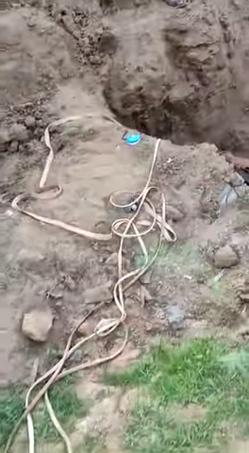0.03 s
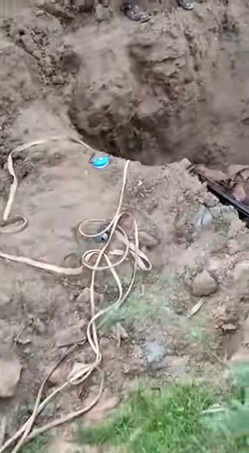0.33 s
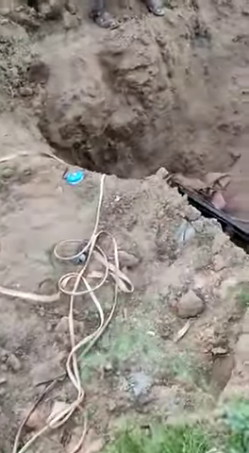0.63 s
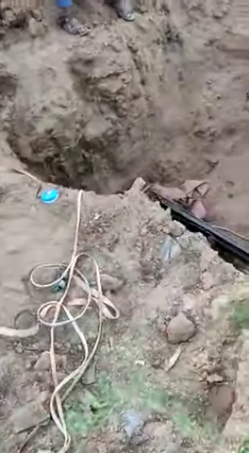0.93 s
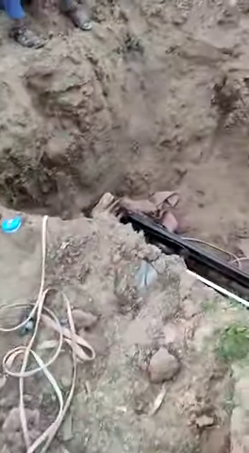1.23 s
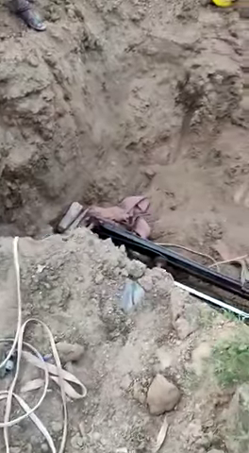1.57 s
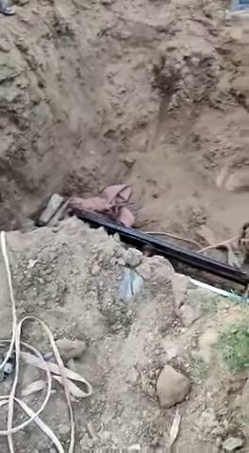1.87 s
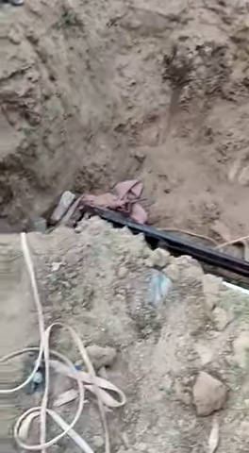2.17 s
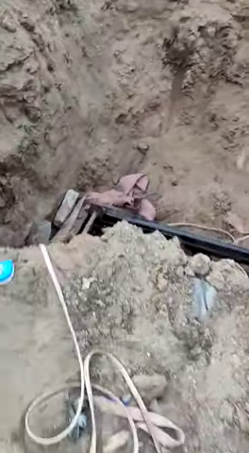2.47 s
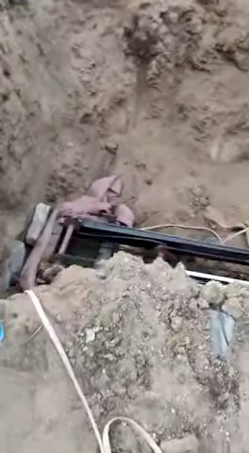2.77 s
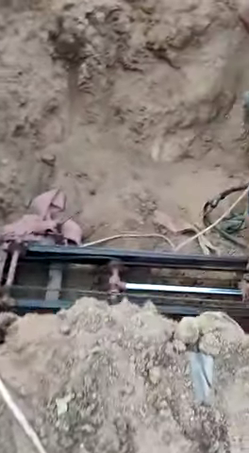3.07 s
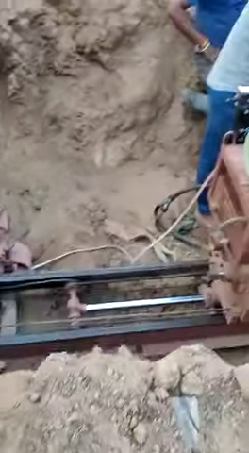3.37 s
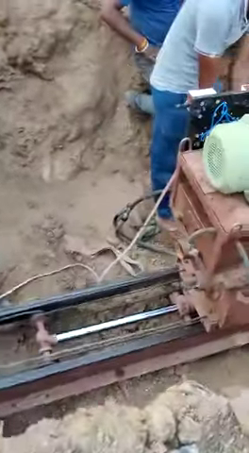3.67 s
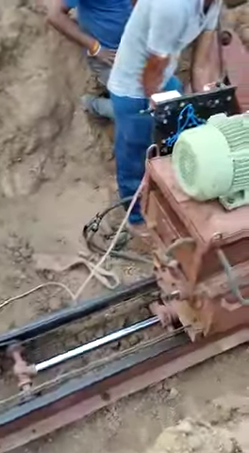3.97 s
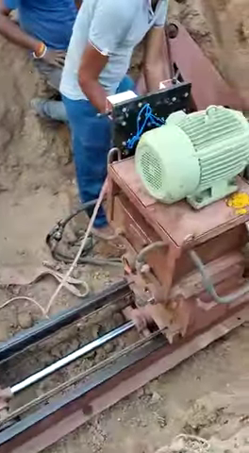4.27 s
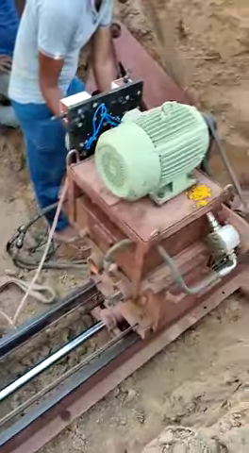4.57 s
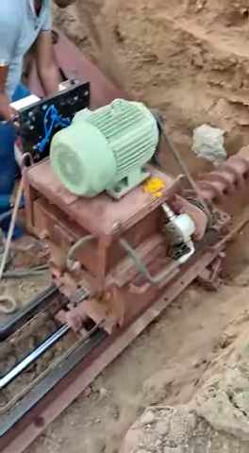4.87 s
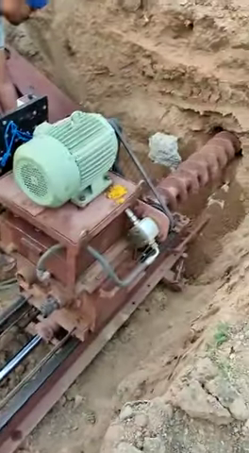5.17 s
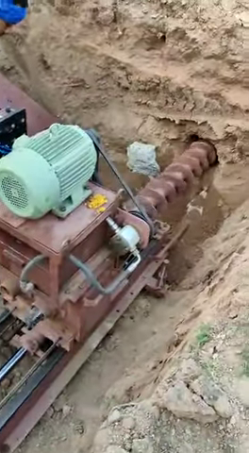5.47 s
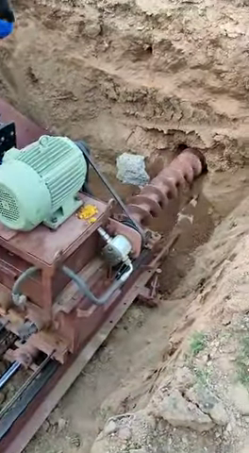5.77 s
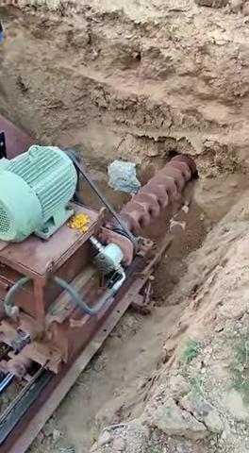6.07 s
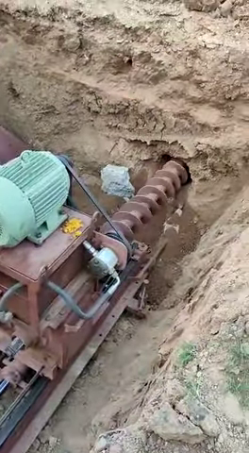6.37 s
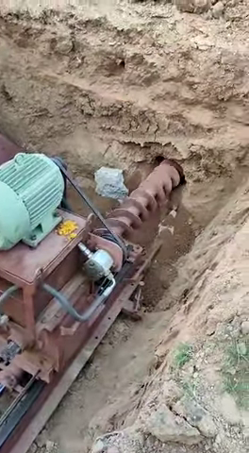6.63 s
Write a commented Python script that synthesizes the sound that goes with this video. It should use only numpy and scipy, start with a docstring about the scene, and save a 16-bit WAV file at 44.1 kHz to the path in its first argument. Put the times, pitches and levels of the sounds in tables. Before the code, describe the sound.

A generator engine drones steadily beside an earth pit, with rapid knocking, gear clatter and a bright, fast metallic tick. The boring rig's drive adds a rough whine over a low rumble. As the microphone moves along the rim toward the rig, a few dull thumps, small knocks and one scuff pass by. Near the end the auger's hollow churning grows louder while the engine keeps its pace.

```python
"""An auger boring rig in an earth pit.

A listener walks along the rim. The four-stroke generator that feeds the rig's electric motor sets the beat:
an exhaust drone, a block that knocks alike in every cycle, and one bright steel tick per turn. The drive
whines and the auger churns in its bore, over a low rumble, a few dull thumps, small knocks and one scuff."""
import sys
import numpy as np
from scipy import signal
from scipy.fft import rfft, irfft, next_fast_len
from scipy.io import wavfile
from scipy.ndimage import map_coordinates

SR = 44100
rng = np.random.default_rng(int(sys.argv[2]) if len(sys.argv) > 2 else 0)


def to_wav(sig):
    """Store sig (one row per channel, or 1-D mono) as 16-bit WAV at the path in sys.argv[1].

    Samples outside -1..1 are clipped; the rate is SR.
    """
    pcm = np.clip(np.atleast_2d(sig), -1, 1) * 32767
    pcm = np.round(pcm).astype(np.int16)
    wavfile.write(sys.argv[1], SR, pcm.T)  # frames by channels


N = 295470


def amp(db):
    """Amplitude ratio of a level in decibels."""
    return 10 ** (np.asarray(db) / 20)

def unit(x):
    """Normalisation to an rms of 1."""
    return x / np.sqrt(np.mean(x ** 2) + 1e-20)

def curves(rows):
    """Linear interpolation in time: one curve for each column after the first."""
    times, *columns = np.transpose(rows)
    return [np.interp(np.arange(N) / SR, times, column) for column in columns]

def wobble(rate):
    """Smooth random modulation, with rate knots a second."""
    return map_coordinates(rng.standard_normal(int(N * rate / SR) + 4), [np.arange(N) * rate / SR])

def filtered(x, response):
    """Linear filtering: the spectrum is multiplied by a frequency response."""
    size = next_fast_len(N + 8192)
    return irfft(rfft(x, size) * response(np.fft.rfftfreq(size, 1 / SR)), size)[..., :N]

def colour(x, points):
    """Spectral shaping by (Hz, dB) points on a logarithmic frequency axis."""
    f, db = np.transpose(points)
    return filtered(x, lambda hz: amp(np.interp(np.log(hz + 1), np.log(f), db)))

def ringing(x, modes, sign=-1):
    """Modal superposition of (Hz, bandwidth, dB) resonances; a sign near 1 leaves notches between them."""
    return filtered(x, lambda f: sum(sign ** k * amp(db) * 1j * f * width / (hz**2 - f**2 + 1j * f * width)
                                     for k, (hz, width, db) in enumerate(modes)))

def shifted(x, hz):
    """Single-sideband modulation slides every frequency by a curve in Hz."""
    analytic = signal.hilbert(x, next_fast_len(N))[..., :N]
    return np.real(analytic * np.exp(2j * np.pi * np.cumsum(hz) / SR))

def pan(balance_db):
    """Constant-power panning; a positive balance favours the left."""
    gains = amp(np.array([[.5], [-.5]]) * balance_db)
    return gains / np.sqrt(np.mean(gains ** 2, axis=0))

def spread(pair, side_db):
    """Mid-side stereo from two uncorrelated signals."""
    side = amp(side_db) * pair[1]
    return np.array([pair[0] + side, pair[0] - side])

def cyclic(turn, memory, fresh):
    """Quasi-periodic noise pair: a drifting two-turn pattern plus a fresh share of the power."""
    size = int(2 * N / (turn[-1] - turn[0]))
    cycles = rng.standard_normal((2, int(turn[-1] / 2) + 2, size))
    keep = np.clip(memory, 0, .995)
    for i in range(1, cycles.shape[1]):
        cycles[:, i] = keep * cycles[:, i - 1] + np.sqrt(1 - keep ** 2) * cycles[:, i]
    pattern = np.array([map_coordinates(c.ravel(), [turn * size / 2]) for c in cycles])
    return np.sqrt(1 - fresh) * pattern + np.sqrt(fresh) * rng.standard_normal((2, N))

def blows(turn, angle, rise, decay, scatter_db):
    """Exponential envelope of one blow per turn; angle, rise and decay are in turns."""
    count, age = np.divmod(turn - angle + 1, 1)
    force = amp(scatter_db * rng.standard_normal(256))[count.astype(int) % 256]
    return force * (1 - np.exp(-age / rise)) * np.exp(-age / decay)

def labour(turn):
    """Amplitude modulation at half the shaft rate: every second turn labours harder."""
    return amp(-1.3 * np.sin(np.pi * turn))

# Each row: time in seconds, nearness to the rig from 0 to 1.
NEARNESS = [(0, 0.2), (2.5, 0.17), (3.3, 0.44), (4.3, 0.76)]
def nearness():
    """The listener's position along the walk: 0 is far from the rig, 1 beside it."""
    return curves(NEARNESS)[0]

def walk_gain(far_db, near_db, screened_db=0):
    """Level follows position and drops in the acoustic shadow of a spoil heap."""
    heap_s, width_s = 2.68, .99
    shadow = np.exp(-((np.arange(N) / SR - heap_s) / width_s) ** 2)
    return amp(far_db + (near_db - far_db) * nearness() - screened_db * shadow)

# The weaker exhaust lines. Each row: multiple of the shaft rate, relative level in dB.
EXHAUST_LINES = [(1, -18.5), (1.5, -26), (2.5, -16.5), (3, -14.5), (3.5, -8), (4.5, -7.5), (5, 3.5),
                 (5.5, -22), (6, 2), (6.5, -13), (7, -10.5), (8, -18.5), (9, -17.5)]
# Each row: time in seconds, level of the firing tone's octave in dB, level of the weaker lines in dB.
STANDING_WAVES = [(0, -25, -28.5), (.4, -26, -27.5), (.9, -19.5, -27), (1.36, -16, -32), (1.8, -15, -33),
                  (2.2, -14.5, -30.5), (2.75, -15, -26.5), (3.6, -18.5, -29), (4.7, -20, -28),
                  (6.7, -20, -28.5)]
def exhaust(turn, limp=.15):
    """Periodic firing, heard through standing waves: one weak, late cylinder of four adds extra lines."""
    def line(order, lag=0):
        return -np.sqrt(2) * np.sin(2 * np.pi * (order * turn - lag))
    octave_db, weak_db = curves(STANDING_WAVES)
    weak = np.zeros(N)
    for order, db in EXHAUST_LINES:
        lead = 0 if 3 < order < 6 else .25  # in cycles; lines outside the pipe's boom lead
        weak += amp(db + .35 * wobble(3)) * line(order, lag=2 * limp * (order % 1) - lead)
    firing = walk_gain(far_db=-17, near_db=-27.5, screened_db=1.5) * amp(.1 * wobble(6)) * line(order=2)
    octave = amp(octave_db + .1 * wobble(11)) * line(order=4)
    return (firing + octave + amp(weak_db) * unit(weak)) * pan(np.interp(nearness(), [0, 1], [6.5, 6]))

# Each row: frequency in Hz, relative spectral density in dB.
BLOCK_SPECTRUM = [(130, -14), (200, -1.5), (250, -7), (320, -5.5), (440, -3), (600, -1.5), (800, -6),
                  (1000, -9.5), (1500, -22), (3000, -66.5)]
def block(turn, shake):
    """Forced vibration: the engine block is shaken alike in each cycle."""
    noise = spread(colour(cyclic(turn, memory=.85, fresh=.51), BLOCK_SPECTRUM), side_db=-5)
    return unit(noise * (1 + .5 * shake) * labour(turn)) * pan(1)

# Gear bodies, teeth and clack. Each row: frequency in Hz, relative spectral density in dB.
GEAR_SPECTRUM = [(450, -13), (800, -8.5), (1150, -0.5), (1450, -3), (1750, -6), (2500, -23), (3500, -36)]
TEETH_SPECTRUM = [(900, -20), (1400, -1), (1750, -2.5), (2100, -3), (2600, -8), (3500, -13), (6000, -28.5)]
CLACK_SPECTRUM = [(600, -21), (1000, -9), (1400, 0), (1800, -9), (2500, -21), (3500, -33)]
# Each row: frequency in Hz, phase lead of the left microphone port in radians.
PORT_PHASE = [(0, -3.5), (780, -0.4), (1810, -2.5), (2240, -2.5), (3700, -4), (5600, -6), (6630, -5),
              (7320, -4.5), (8440, 7)]
def gears(turn, shake, body_db, teeth_db):
    """Impact noise: gears rattle, clack every second turn and reach the two ports out of phase."""
    body = spread(colour(cyclic(turn, memory=.928, fresh=.37), GEAR_SPECTRUM), side_db=-5.5)
    body = amp(body_db) * unit(body * (1 + 1.8 * shake) * labour(turn))
    teeth = spread(colour(cyclic(turn, memory=.995, fresh=.4), TEETH_SPECTRUM), side_db=-5)
    teeth = amp(teeth_db) * unit(teeth * (1 + 2.2 * shake) * labour(turn))
    clack = spread(colour(cyclic(turn, memory=.99, fresh=.2), CLACK_SPECTRUM), side_db=-11.5)
    clack *= blows(turn / 2, angle=.85, rise=.0091, decay=.03, scatter_db=1.8)
    clack = walk_gain(far_db=-55.5, near_db=-49) * unit(clack)
    drive = (body + clack) * pan(-11.5) + teeth * pan(-19.5)
    f, lead = np.transpose(PORT_PHASE)
    return filtered(drive, lambda hz: np.exp(np.array([[.5j], [-.5j]]) * np.interp(hz, f, lead)))

# Each row: frequency in Hz, bandwidth in Hz, relative level in dB.
HOLLOW_MODES = [(307.5, 45, -1), (347, 54, 1.5)]
# Each row: time in seconds, level in dB.
HOLLOW_LEVEL = [(0, -57), (.7, -52), (1.05, -34.5), (1.35, -42.5), (1.55, -40.5), (2.3, -38.5), (2.9, -43),
                (3.4, -44.5), (6.7, -40)]
def hollow(turn, shake):
    """Resonance: two low modes of the shaken block sound hollow, loudest along the far rim."""
    level_db, = curves(HOLLOW_LEVEL)
    excitation = cyclic(turn, memory=.93, fresh=.4)[0] * (1 + shake)
    return amp(level_db) * unit(ringing(excitation, HOLLOW_MODES)) * pan(1)

# The casing from afar and up close. Each row: frequency in Hz, relative spectral density in dB.
FAR_PANELS = [(1300, -21), (2200, -1.5), (3000, -1), (3650, 0.5), (4050, -1.5), (4400, -0.5), (5000, -2),
              (5700, 6), (7200, 5.5), (9000, -28)]
NEAR_PANELS = [(1300, -20.5), (2200, -2.5), (3300, -2), (4000, -1), (4400, -1.5), (4600, -2), (5300, 3.5),
               (6000, 7.5), (7200, 3.5), (9000, -29.5)]
def casing_rattle(turn, shake):
    """Directional radiation: other rattling panels face the listener up close."""
    near = nearness()
    rattle = cyclic(turn, memory=.995, fresh=.78)
    panels = (1 - near) * colour(rattle, FAR_PANELS) + near * colour(rattle, NEAR_PANELS)
    casing = unit(spread(panels, side_db=1) * (1 + 1.8 * shake))
    return walk_gain(far_db=-37.5, near_db=-35.5, screened_db=3) * casing * pan(2.5)

# Each row: time in seconds, then the levels in dB of the block, the gear bodies and the teeth.
CLATTER_LEVELS = [(0, -35, -41.5, -42), (.65, -34, -40.5, -41.5), (1.1, -32.5, -36.5, -47),
                  (1.45, -34.5, -36.5, -46), (2.4, -36.5, -41, -44.5), (3.4, -39, -37.5, -46.5),
                  (4.1, -35.5, -38, -40), (4.7, -36, -38.5, -37.5), (5.4, -38.5, -38, -41.5),
                  (6.7, -35.5, -41.5, -40)]
def clatter(turn):
    """Common excitation: two blows a turn shake block, gears and casing together."""
    block_db, body_db, teeth_db = curves(CLATTER_LEVELS)
    shake = blows(turn, angle=.612, rise=.086, decay=.21, scatter_db=2)
    shake += .72 * blows(turn, angle=.091, rise=.081, decay=.17, scatter_db=1)
    return (amp(block_db) * block(turn, shake) + gears(turn, shake, body_db, teeth_db)
            + hollow(turn, shake) + casing_rattle(turn, shake))

# The knocks of one two-turn cycle. Each row: shaft angle in turns, relative level in dB, pitch in Hz.
STROKES = [(.12, -7.5, 811), (.27, -4, 372), (0.589, -7.5, 755), (0.861, -8, 424), (1.175, -0.5, 830),
           (1.269, 0, 407), (1.37, -6.5, 782), (1.43, -4.5, 388), (1.95, -6.5, 318)]
def engine_knocks(turn, turns_per_s, rise_s=.0015, scatter_db=1.6, detune=.05):
    """Damped oscillations recur in a limping pattern, each with its own force and pitch."""
    out = np.zeros(N)
    for angle, db, hz in STROKES:
        count, age_turns = np.divmod(turn - angle + 2, 2)
        age = age_turns / turns_per_s
        force, pitch = rng.standard_normal((2, 128))[:, count.astype(int)]
        envelope = amp(db + scatter_db * force) * age / rise_s * np.exp(1 - age / rise_s)
        out += envelope * np.sin(2 * np.pi * hz * (1 + detune * pitch) * age)
    return walk_gain(far_db=-27.5, near_db=-29, screened_db=1) * out * pan(-.5)

def snaps(turn, left_lag):
    """Impulse train: one contact per turn, reaching the left port left_lag turns later."""
    count = np.floor(np.array([turn - left_lag, turn]) - .554)
    return np.diff(count, append=count[:, -1:]) * amp(1.4 * rng.standard_normal((2, N)))

# Casing modes, and those added up close. Each row: frequency in Hz, bandwidth in Hz, relative level in dB.
FAR_MODES = [(4295, 110, -3.5), (4390, 120, 0.5)]
NEAR_MODES = [(3622, 140, -2), (3710, 110, -2.5), (5350, 91, 4), (5660, 63, 3), (5930, 63, 2.5)]
# Each row: time in seconds, level of the far modes in dB.
FAR_MODE_LEVEL = [(0, -56), (.6, -49.5), (.9, -56), (2.0, -54.5), (2.2, -50.5), (3.4, -51), (3.9, -51.5),
                  (6.7, -52.5)]
def casing_ring(turn, force):
    """Impact excitation: each tick jolts the casing into ringing."""
    far_db, = curves(FAR_MODE_LEVEL)
    shudder = cyclic(turn, memory=.85, fresh=.99)
    shudder *= blows(turn, angle=.55, rise=.024, decay=.19, scatter_db=.5)
    jolt = unit(force * snaps(turn, left_lag=.0014)) + amp(-2) * unit(shudder)
    close_ring = amp(-40) * nearness() * unit(ringing(jolt, NEAR_MODES))
    return amp(far_db) * unit(ringing(jolt, FAR_MODES)) + close_ring

# The steel's broad and high rings. Each row: frequency in Hz, bandwidth in Hz, relative level in dB.
BROAD_MODES = [(5450, 120, -8.5), (6120, 90, -4.5), (6300, 100, -1.5), (6520, 150, 8), (6700, 88, -1.5)]
HIGH_MODES = [(6910, 90, -12), (7176, 72, -1), (7435, 27, -3)]
# Its sizzle between snaps. Each row: frequency in Hz, relative spectral density in dB.
BROAD_SIZZLE = [(4700, -28.5), (5400, -6.5), (6000, -5), (6500, 5.5), (6850, -4), (7400, -22), (8400, -32)]
HIGH_SIZZLE = [(6000, -29.5), (6950, -7.5), (7200, -10.5), (7450, -8), (7750, -11.5), (8400, -34)]
# Its uneven beaming along the rim. Each row: time in seconds, broad ring in dB, high ring in dB.
TICK_LEVELS = [(0, -39, -36.5), (.6, -39.5, -35.5), (.8, -47, -45.5), (1.3, -41.5, -41), (2.4, -38.5, -39),
               (3.3, -39.5, -35), (3.58, -44, -42.5), (3.85, -33.5, -34.5), (4.4, -43, -39),
               (4.72, -33.5, -34.5), (5.1, -39, -38.5), (5.5, -42.5, -34.5), (6.7, -40, -37.5)]
# Each row: time in seconds, frequency in Hz to which the strongest broad mode is shifted.
RING_CENTRE = [(0, 6512), (.65, 6500), (.9, 6158), (1.35, 6600), (2.3, 6600), (3.3, 6645), (3.85, 6506),
               (4.4, 6566), (4.68, 6605), (4.92, 6317), (5.4, 6680), (6.7, 6750)]
def steel_tick(turn):
    """Modal ringing: steel snaps shut once a turn and sizzles; a weaker contact comes half a turn on."""
    broad_db, high_db = curves(TICK_LEVELS)
    force = amp(-.5 * np.sin(np.pi * turn) + .56 * wobble(30))
    push = ringing(force * snaps(turn, left_lag=.0034), [(6400, 2000, 0)])  # contact takes time to build
    scrape = blows(turn, angle=.544, rise=.023, decay=.041, scatter_db=4.5)
    tail = blows(turn, angle=.537, rise=.016, decay=.15, scatter_db=1)
    tail += .59 * blows(turn, angle=.085, rise=.022, decay=.29, scatter_db=1.5)
    def sizzle():
        return cyclic(turn, memory=.96, fresh=.4) * (1 + 3.1 * tail + 4.7 * scrape)
    def steel(modes, spectrum):
        struck = unit(ringing(push, modes, sign=.92))
        scraped = amp(-6) * unit(ringing(sizzle(), modes))
        hiss = amp(-3.5) * unit(colour(sizzle(), spectrum))
        return unit(struck + scraped + hiss)
    casing = casing_ring(turn, force)
    slide_hz = curves(RING_CENTRE)[0] - BROAD_MODES[-2][0]
    broad = amp(broad_db) * shifted(steel(BROAD_MODES, BROAD_SIZZLE), slide_hz)
    high = amp(high_db) * steel(HIGH_MODES, HIGH_SIZZLE) * pan(-13)
    return casing + broad + high

# Each row: time in seconds, level in dB.
WHINE_LEVEL = [(0, -45.5), (.3, -37), (.5, -44.5), (.9, -39.5), (1.8, -39), (2.15, -44.5), (2.7, -59),
               (3.4, -45.5), (6.7, -46.5)]
def gear_whine(turn, mesh_order=32.5):
    """Tooth meshing: the drive sings one rough note at a multiple of the shaft rate."""
    level_db, = curves(WHINE_LEVEL)
    grit = unit(ringing(rng.standard_normal(N), [(843, 31, 0)]))
    gain = amp(level_db + .55 * wobble(30))
    tone = np.sin(2 * np.pi * mesh_order * turn + .13 * wobble(22))
    return gain * unit(tone + .46 * grit) * pan(-11)

# Each row: multiple of the shaft rate, relative level in dB.
FRAME_PARTIALS = [(11, -2), (12, -0.5), (13, -11), (16, -5.5), (18, -5), (20, -11), (22.5, -10),
                  (29, -14.5), (37, -13)]
def frame_hum(turn):
    """Forced vibration: the frame hums steadily at harmonics of the engine cycle."""
    hum = np.zeros(N)
    for order, db in FRAME_PARTIALS:
        gain = amp(db + .56 * wobble(5.5))
        hum += gain * np.sin(2 * np.pi * order * turn + rng.uniform(0, 2 * np.pi) + .5 * wobble(6))
    return walk_gain(far_db=-36.5, near_db=-40) * unit(hum) * pan(4)

# Each row: frequency in Hz, bandwidth in Hz, relative level in dB.
TUBE_MODES = [(225, 55, -2), (299.3, 40, -1), (359, 56, -3), (460, 54, -2.5), (575, 57, -4.5)]
# The churning, loudest once the bore comes into view. Each row: time in seconds, level in dB.
CHURN_LEVEL = [(0, -41), (1.2, -41.5), (3.5, -55), (4.4, -42.5), (5.3, -34.5), (6.7, -39)]
def auger(turn):
    """Resonance: uneven shoves against the soil sound the auger's steel tube."""
    level_db, = curves(CHURN_LEVEL)
    shoves = amp(2.2 * wobble(20) + 1.5 * np.sin(np.pi * turn)) * cyclic(turn, memory=.93, fresh=.4)
    return amp(level_db) * unit(spread(ringing(shoves, TUBE_MODES), side_db=-7.5)) * pan(2)

# Each row: frequency in Hz, relative spectral density in dB.
RUMBLE_SPECTRUM = [(18, -12.5), (40, -5.5), (100, -2), (160, -5.5), (250, -10), (400, -23.5), (900, -47.5)]
# Each row: time in seconds, level in dB.
RUMBLE_LEVEL = [(0, -34), (.2, -25.5), (.5, -31.5), (1.4, -32.5), (2.3, -38), (6.7, -42)]
def rumble():
    """Randomly modulated low-frequency noise lies under the drone."""
    level_db, = curves(RUMBLE_LEVEL)
    noise = spread(colour(rng.standard_normal((2, N)), RUMBLE_SPECTRUM), side_db=-17)
    return amp(level_db + 1.7 * wobble(11)) * unit(noise) * pan(10)

# Each row: start in seconds, level in dB, frequency in Hz, bandwidth in Hz, 60 dB decay time in seconds.
LOOSE_THUMPS = [(.145, -27.5, 230.3, 91.6, 0.16), (.36, -29, 243.7, 81.6, 0.32),
                (1.21, -27, 316, 128.8, 0.11), (1.664, -23, 814, 201.5, 0.045), (2.29, -22, 338.7, 60, 0.1),
                (2.766, -22, 317, 69.2, 0.078), (2.905, -37, 2830, 2230, 0.11),
                (5.98, -24.5, 658, 298.3, 0.081)]
def loose_thumps(rise_s=.0035):
    """Damped transients: a few dull thumps like footsteps or handling, small knocks and one scuff."""
    t, out = np.arange(N) / SR, np.zeros(N)
    for start, db, hz, width, t60 in LOOSE_THUMPS:
        age = np.maximum(t - start, 0)
        wandering_hz = hz + .3 * width * wobble(2 * width)
        body = np.sqrt(2) * np.sin(2 * np.pi * np.cumsum(wandering_hz) / SR)
        out += amp(db - 60 * age / t60) * (1 - np.exp(-age / rise_s)) * body
    return out

# Each row: time in seconds, shaft rate in turns per second.
SHAFT_SPEED = [(0, 25.750), (.7, 25.805), (1.9, 25.770), (2.6, 25.704), (4.4, 25.792), (6.7, 25.828)]
def scene():
    """Superposition: the parts that follow the one shaft add to the rumble and the loose thumps."""
    speed, = curves(SHAFT_SPEED)
    turn = .236 + np.cumsum(speed) / SR  # shaft angle in turns
    engine = exhaust(turn) + clatter(turn) + engine_knocks(turn, speed[0]) + steel_tick(turn)
    return engine + gear_whine(turn) + frame_hum(turn) + auger(turn) + rumble() + loose_thumps()

# Each row: frequency in Hz, gain in dB.
MICROPHONE_RESPONSE = [(7400, 0), (7750, -4), (8000, -8), (8400, -15.5), (8877, -19.5)]
CUTOFF_HZ = 8877
def record(dry):
    """Low-pass filtering: the microphone rolls off steeply in the top treble."""
    return filtered(colour(dry, MICROPHONE_RESPONSE), lambda hz: hz < CUTOFF_HZ)


dry = scene()
out = record(dry)
to_wav(out)
```